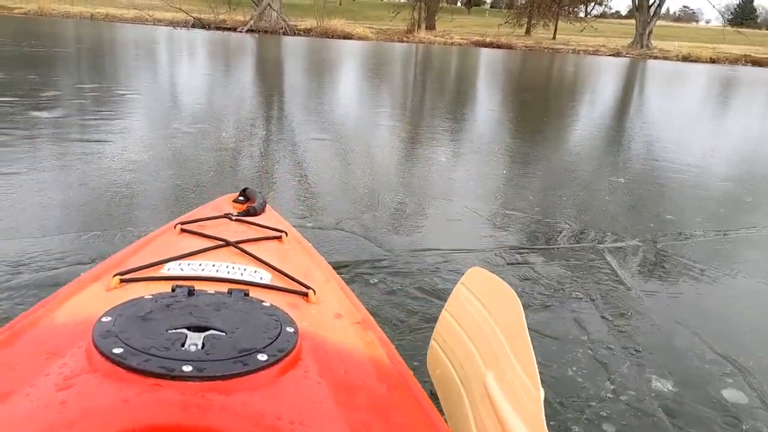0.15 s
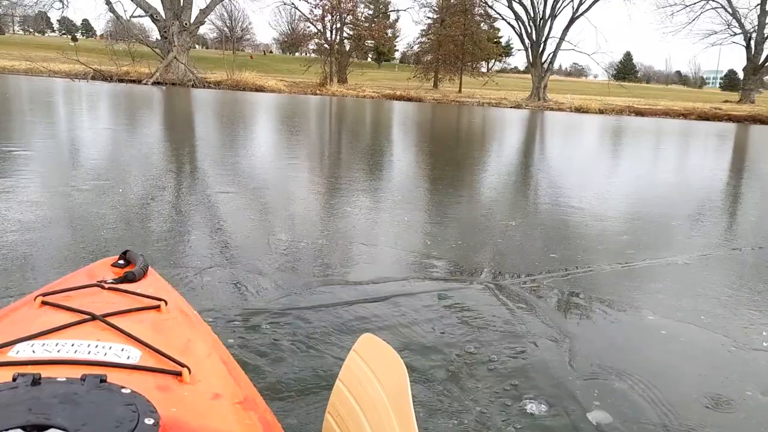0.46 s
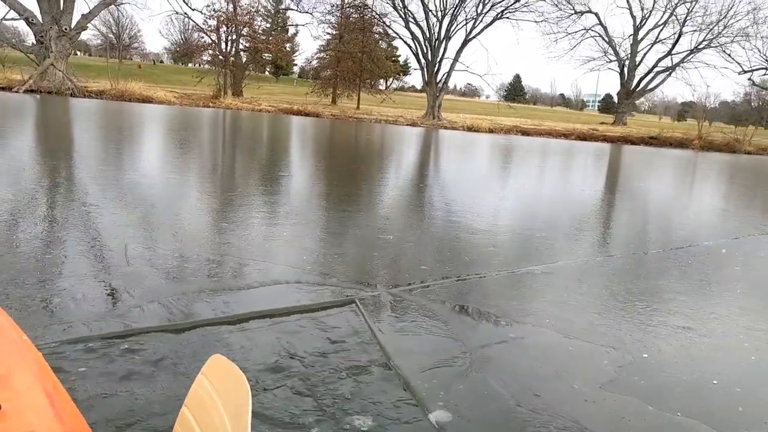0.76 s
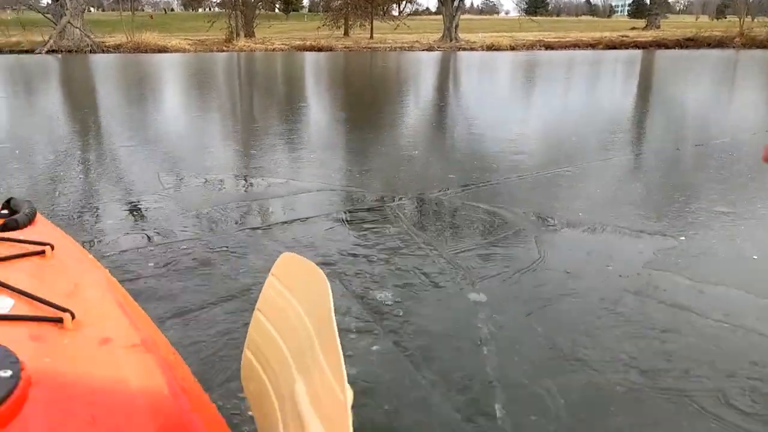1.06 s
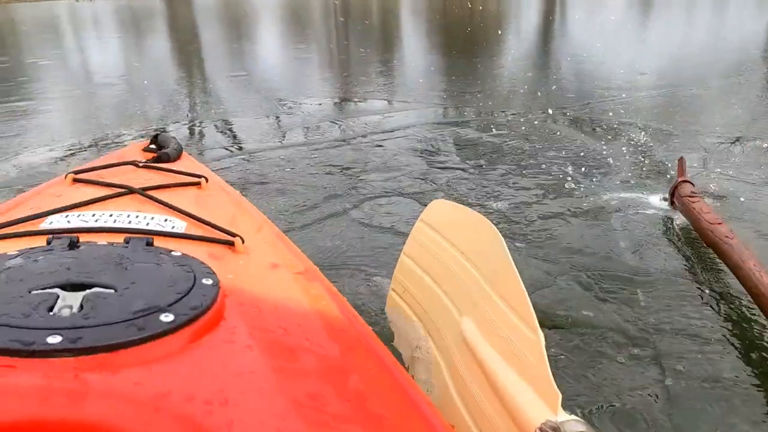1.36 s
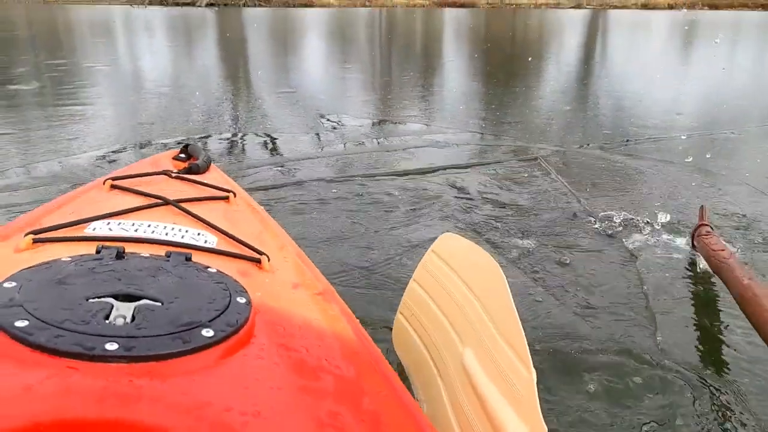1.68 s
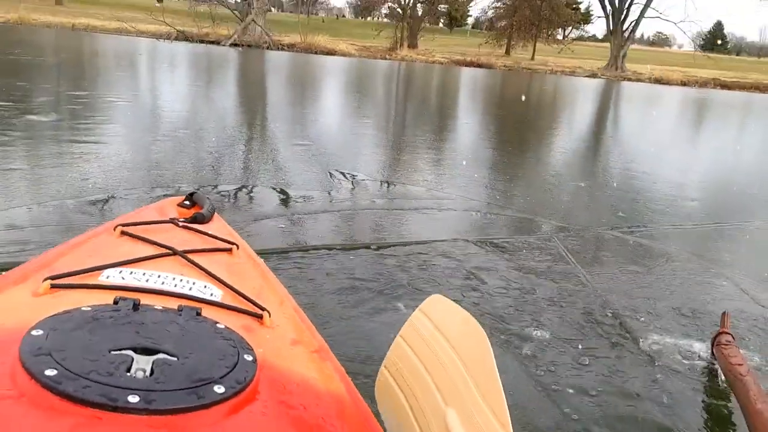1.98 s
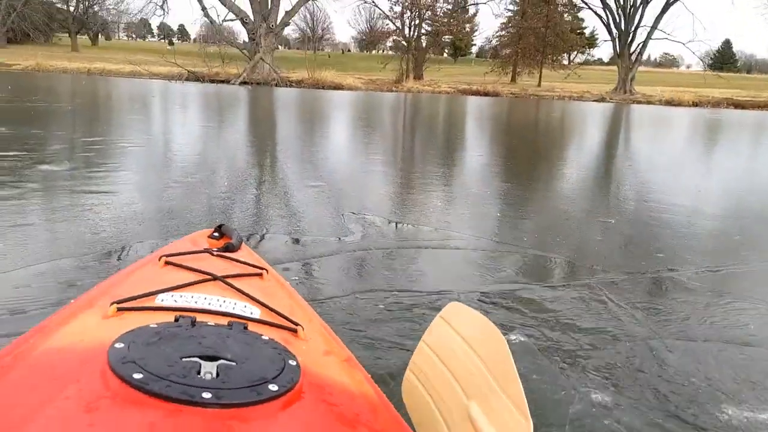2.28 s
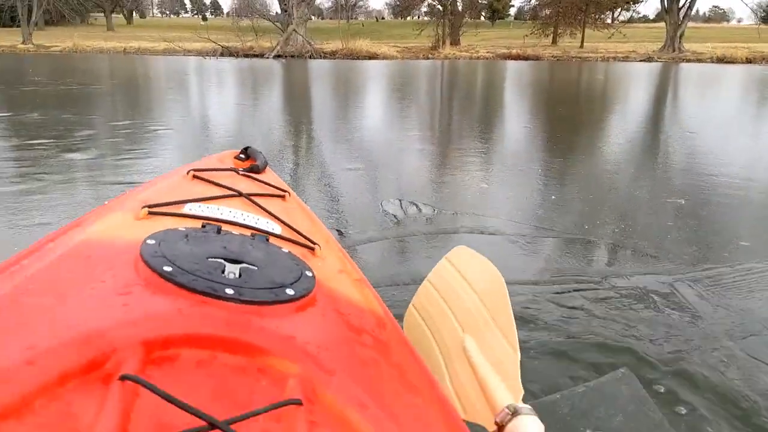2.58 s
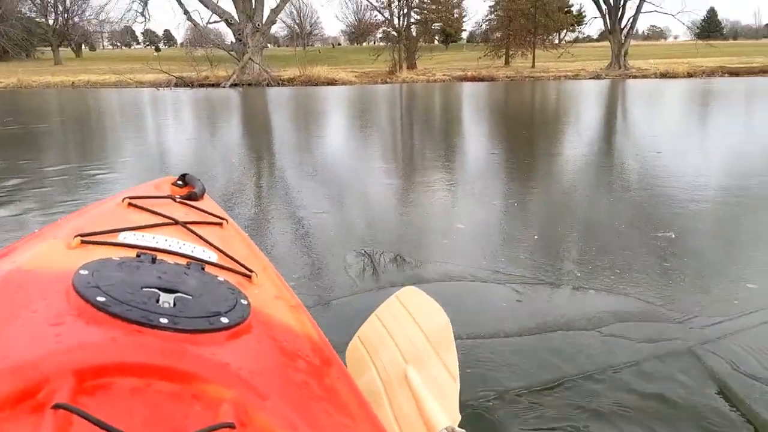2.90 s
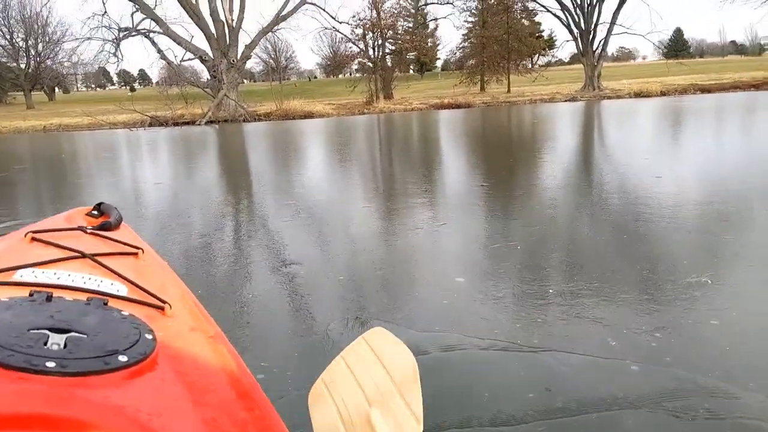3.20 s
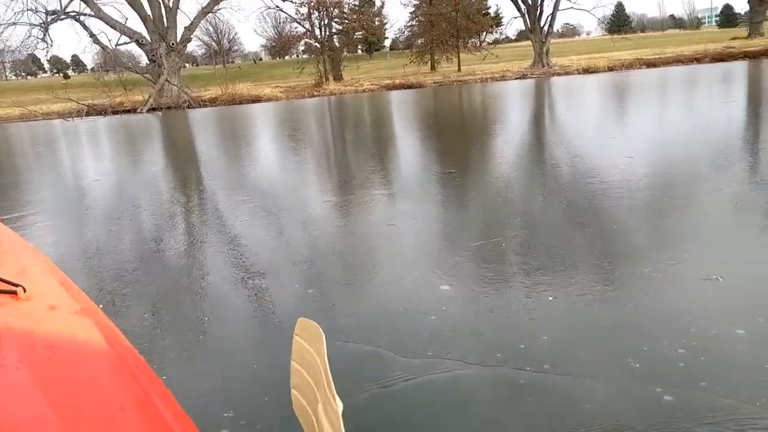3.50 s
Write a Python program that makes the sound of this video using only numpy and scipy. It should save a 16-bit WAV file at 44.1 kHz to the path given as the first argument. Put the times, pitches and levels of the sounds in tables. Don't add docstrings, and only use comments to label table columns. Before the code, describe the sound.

A kayak shoves through thin ice: low crunching grinds, hollow thuds, sharp cracks and wet hiss

```python
import sys
import numpy as np
from scipy import signal
from scipy.fft import rfft, irfft
from scipy.io import wavfile
from scipy.ndimage import uniform_filter1d

SR = 44100
rng = np.random.default_rng(int(sys.argv[2]) if len(sys.argv) > 2 else 0)


def gain_from_decibels(decibels):
    exponent = np.asarray(decibels, float) / 20
    return 10 ** exponent


def pcm_store(signal):
    levels = np.round(np.clip(np.atleast_2d(signal), -1, 1) * 32767)
    wavfile.write(sys.argv[1], SR, levels.astype(np.int16).T)


N = 160965
T = np.arange(N) / SR
F = np.maximum(np.arange(N // 2 + 1) * SR / N, 1)


def unit(x):
    return x / np.sqrt(np.mean(x ** 2) + 1e-18)


def read(table, hz):
    a = np.array(table, float)
    return np.interp(np.log(hz), np.log(a[:, 0]), a[:, 1])


def colour(x, table):
    return irfft(rfft(x) * gain_from_decibels(read(table, F)), N)


def octave(hz):
    return np.clip(1 - np.abs(np.log2(F / hz)), 0, 1)


def band(x, hz, width):
    return signal.lfilter(*signal.iirpeak(min(hz, .45 * SR), max(hz / width, .3), fs=SR), x)


def walk(rate):
    k = int(SR / rate)
    steps = np.repeat(rng.standard_normal(N // k + 1), k)
    return unit(uniform_filter1d(uniform_filter1d(steps, k), k)[:N])


def ticks(rate, spread_db):
    u = rng.random((3, N))
    size_db = np.minimum(-np.log(u[2] + 1e-9), 4) * spread_db
    return (u[0] < rate / SR) * np.sign(u[1] - .5) * gain_from_decibels(size_db)


def fade(x, t60):
    return signal.lfilter([1], [1, -np.exp(-np.log(1000) / (t60 * SR))], x)


def span(start, length):
    return slice(int(start * SR), int((start + length) * SR))


def shape(at, rise, hold, t60):
    out = np.zeros(N)
    i = slice(max(int(at * SR), 0), int((at + rise + hold + 1.2 * t60) * SR))
    t = T[i] - at
    out[i] = np.clip(t / rise, 0, 1) ** 2 * gain_from_decibels(-60 * np.clip(t - rise - hold, 0, None) / t60)
    return out


def bursts(table, noise, width, rise, t60):
    out = np.zeros_like(noise)
    for s, db, hz in table:
        i = span(s, 1.0)
        ring = unit(band(band(noise[:, i], hz, 2 * width * hz), hz, width * hz))
        out[:, i] += gain_from_decibels(db) * shape(s, rise, 0, t60)[i] * ring
    return out


WIND_HZ, WIND_WIDTH_HZ, WIND_DB, WIND_GUST_DB = 58.3, 85, -43, 2.5


def wind():
    low = rng.standard_normal((2, N))
    for _ in range(2):
        low = band(low, WIND_HZ, WIND_WIDTH_HZ)
    gusts = np.array([walk(5.34), walk(5.4)])
    return unit(low) * gain_from_decibels(WIND_DB + WIND_GUST_DB * gusts)


# time in seconds, hiss level in dB, low wash level in dB.
SLUSH_FLOW = [
    (0, -47, -46.5),
    (.62, -47.5, -43.5),
    (.72, -51, -54),
    (1.3, -47.5, -49.5),
    (1.58, -51.5, -49.5),
    (1.9, -47, -46),
    (2.0, -43, -47),
    (2.25, -43.5, -38),
    (2.9, -42, -36.5),
    (3.65, -38, -28),
]
HISS, LOW = 1, 2


def slush_flow(column):
    a = np.array(SLUSH_FLOW)
    return gain_from_decibels(np.interp(T, a[:, 0], a[:, column]))


# pitch in Hz, level in dB per Hz.
HISS_TONE = [(3000, -20), (4000, -15.5), (8600, -12.5), (10800, -22), (13000, -15), (15600, -7.5),
             (15950, -60)]
# pitch in Hz, level in dB per Hz.
WASH_TONE = [(200, -53), (350, -7), (700, 0), (1500, -4.5), (2950, -10.5), (3150, -12.5), (6000, -38)]
SLUSH_DB, SLUSH_SWELL_DB, SLUSH_FLICKER_DB = .1, .8, 1.3


def slush(tone):
    spectrum = rfft(colour(rng.standard_normal((3, N)), tone))
    out, swell = 0, walk(4)
    for hz in 177 * 2. ** np.arange(8):
        part = irfft(spectrum * octave(hz), N)
        out = out + part * gain_from_decibels(SLUSH_SWELL_DB * swell + SLUSH_FLICKER_DB * walk(12))
    return unit(out) * gain_from_decibels(SLUSH_DB)


CHIPS_PER_S, CHIP_DB, CHIP_SPREAD_DB, CHIP_CYCLES = 45, 5, 1.5, 10
CHIP_LOW_HZ, CHIP_HIGH_HZ = 600, 3010


def chips():
    out, t = np.zeros((3, N)), T[:2048]
    for when, pitch, size, a, b, c in rng.random((int(CHIPS_PER_S * N / SR), 6)):
        i = int(when * (N - len(t)))
        hz = CHIP_LOW_HZ * (CHIP_HIGH_HZ / CHIP_LOW_HZ) ** pitch
        envelope = gain_from_decibels(-60 * t * hz / (4 * CHIP_CYCLES)) * np.clip(t * hz / 2, 0, 1)
        ping = np.sin(2 * np.pi * hz * t * (1 + 4 * t)) * envelope
        level = gain_from_decibels(CHIP_DB - CHIP_SPREAD_DB * np.log(size + 0.027))
        out[:, i:i + len(t)] += level * ping * np.array([[1], [b - c], [a - c]])
    return out


RUB_S, RUB_LENGTH_S, RUB_DB = 2.93, .17, -44.5
RUB_HZ, RUB_CLIMB_HZ_PER_S = 195, 190


def rub():
    slip_hz = (RUB_HZ + RUB_CLIMB_HZ_PER_S * (T - RUB_S)) * (1 + .004 * walk(60))
    turns = np.cumsum(slip_hz) / SR
    squeak = sum(gain_from_decibels(3 * walk(30)) * np.sin(2 * np.pi * k * (turns + k / 7)) for k in range(5, 14))
    return gain_from_decibels(RUB_DB) * shape(RUB_S, RUB_LENGTH_S / 2, RUB_LENGTH_S / 2, .05) * unit(squeak)


# pitch in Hz, level in dB, time to die by 60 dB in seconds.
PADDLE_MODES = [(2158, 0, 0.0058), (3740, -12.5, 0.012), (7000, -14.5, 0.015)]
PADDLE_S, PADDLE_RISE_S = 1.3395, 0.0018


def paddle():
    return sum(gain_from_decibels(db) * shape(PADDLE_S, PADDLE_RISE_S, 0, t60) * np.sin(2 * np.pi * hz * T)
               for hz, db, t60 in PADDLE_MODES)


SNAPS_PER_S, SNAP_SPREAD_DB, SNAP_DB, SNAP_T60_S = 35, 3.5, -12, .012


def snaps(noise):
    out = np.zeros((3, N))
    for hz in (5500, 14000):
        clicks = unit(fade(np.abs(ticks(SNAPS_PER_S, SNAP_SPREAD_DB)), SNAP_T60_S))
        out += gain_from_decibels(SNAP_DB) * clicks * slush_flow(HISS) * unit(band(noise, hz, hz / 2))
    return out


# start in seconds, level in dB, pitch in Hz.
POPS = [(0.099, -34, 900), (0.222, -28, 600), (0.633, -24, 452), (0.717, -34, 1540), (0.921, -32.5, 1160),
        (1.279, -29, 571), (1.34, -14, 603), (2.0, -13.5, 1230), (2.086, -11.5, 1120), (2.255, -23, 860),
        (2.407, -15, 1300), (2.43, -11, 634), (2.47, -24, 750), (2.534, -19, 586), (2.93, -21.5, 560),
        (3.121, -12, 480), (3.229, -15, 450), (3.26, -31, 716), (3.33, -10.5, 880), (3.5, -27, 603),
        (3.621, -21.5, 640), (0.337, -21.5, 910), (0.509, -20.5, 490), (0.744, -14.5, 513),
        (0.997, -25, 960), (1.092, -19, 810), (1.15, -11.5, 900), (1.372, -16, 890), (1.542, -27, 515),
        (1.674, -29, 1480), (1.804, -31.5, 1700), (1.937, -12.5, 646), (1.995, -13, 660),
        (2.09, -10.5, 567), (2.405, -14, 635), (3.14, -18, 1080)]
POP_WIDTH, POP_GAIN_DB, POP_RISE_S, POP_T60_S = 0.32, -7, 0.0024, 0.08


def pops(noise):
    return gain_from_decibels(POP_GAIN_DB) * bursts(POPS, noise, POP_WIDTH, POP_RISE_S, POP_T60_S)


GRIT_PER_S, GRIT_SPREAD_DB, GRIT_T60_S = 600, 4.5, .012


def grit():
    return unit(fade(np.abs(ticks(GRIT_PER_S, GRIT_SPREAD_DB)), GRIT_T60_S))


# start in seconds, length in seconds, level in dB, strongest pitch in Hz.
CRUMBLES = [(0.29, 0.29, -49.5, 4600), (0.898, 0.32, -47, 8370), (1.354, 0.035, -33, 1150),
            (1.404, 0.028, -43, 1970), (1.473, 0.032, -43.5, 2400), (1.531, 0.02, -47.5, 2300),
            (1.648, 0.036, -46, 7300), (1.932, 0.092, -37, 2230), (2.055, 0.036, -39.5, 8350),
            (2.296, 0.016, -26, 5300), (2.373, 0.053, -31.5, 7700), (2.405, 0.054, -28, 1130),
            (2.431, 0.036, -30, 8750), (2.713, 0.06, -41.5, 6250), (3.121, 0.039, -27, 8100),
            (3.243, 0.041, -27.5, 5020), (3.296, 0.017, -32, 4930), (3.31, 0.13, -37, 8400),
            (3.554, 0.062, -45, 1900)]
CRUMBLE_RISE, CRUMBLE_T60_S = 0.25, 0.12
CRUMBLE_RING_DB, CRUMBLE_RING_WIDTH = -2, .2
PURE_AFTER_S = .05


def crumbling(noise, ice):
    common = grit()
    parts = [irfft(rfft(ice) * octave(hz), N) * (common + grit()) for hz in 500 * 2. ** np.arange(6)]
    wide = unit(sum(parts))
    narrow, out = grit() + common, np.zeros((3, N))
    for s, length, db, hz in CRUMBLES:
        i = span(s, length + 0.28)
        pure = np.sqrt(np.clip(length / PURE_AFTER_S, 1, 2))
        tone = unit(band(noise[:, i], hz, CRUMBLE_RING_WIDTH * hz / pure ** 2))
        ring = pure * gain_from_decibels(CRUMBLE_RING_DB) * narrow[i] * tone
        envelope = shape(s, CRUMBLE_RISE * length, (1 - CRUMBLE_RISE) * length, CRUMBLE_T60_S)[i]
        out[:, i] += gain_from_decibels(db) * envelope * (wide[:, i] + ring / 2)
    return out


# start in seconds, level in dB, pitch of the ring in Hz.
CRACKS = [(0.5097, -34, 1990), (0.631, -34.5, 8600), (0.9996, -36, 2000), (1.399, -33, 7000),
          (1.4925, -39, 2490), (1.8, -32, 2190), (1.885, -33.5, 2880), (1.954, -34, 2070),
          (2.084, -18.5, 1420), (2.215, -34, 2320), (2.454, -21, 2140), (2.51, -24, 2740),
          (2.7161, -24, 2000), (2.9343, -29, 13400), (2.9744, -30, 13500), (3.0395, -36, 13000),
          (3.1193, -16, 3470), (3.253, -21, 4800), (3.261, -15.5, 2660), (3.2922, -15.5, 2830),
          (3.3042, -16, 7300), (3.39, -25, 2480), (3.5869, -24, 1990), (1.34, -9, 2180),
          (1.3517, -11.5, 3600), (1.467, -31, 5450), (1.6479, -25, 7650), (1.929, -26, 2850),
          (1.982, -19.5, 2700), (1.9922, -20, 2120), (2.031, -26.5, 5540), (2.0723, -24.5, 3070),
          (2.135, -26.5, 7430), (2.155, -23, 7700), (2.1784, -34, 14600), (2.2997, -14, 2470),
          (2.3226, -15.5, 2060), (2.4051, -19, 2330), (2.6709, -18.5, 7150), (2.7396, -22.5, 9100),
          (3.1358, -11.5, 3200), (3.2264, -25, 2600), (3.3737, -21.5, 8250), (3.4412, -19, 2620),
          (3.549, -23, 2350)]
CRACK_GAIN_DB, CRACK_RISE_S, CRACK_T60_S = -3.5, 0.00067, 0.042
CRACK_RING_DB, CRACK_RING_WIDTH = -5, 0.31


def cracks(noise, ice):
    envelope = sum(gain_from_decibels(db + CRACK_GAIN_DB) * shape(s, CRACK_RISE_S, 0, CRACK_T60_S) for s, db, _ in CRACKS)
    ring = bursts(CRACKS, noise, CRACK_RING_WIDTH, CRACK_RISE_S, CRACK_T60_S)
    return ice * envelope + gain_from_decibels(CRACK_GAIN_DB + CRACK_RING_DB) * ring


# pitch in Hz, level in dB per Hz.
ICE_TONE = [(350, -20), (700, -2.5), (1500, -7.5), (2500, -9), (4000, -16.5), (8500, -16), (10800, -24),
            (15600, -10.5), (16900, -58)]


def breaking():
    noise = rng.standard_normal((3, N))
    ice = unit(colour(noise, ICE_TONE))
    return crumbling(noise, ice) + snaps(noise) + cracks(noise, ice) + pops(noise)


# start in seconds, level in dB, pitch in Hz, level of the overtones in dB.
KNOCKS = [(0.005, -16, 136, -19), (0.059, -17, 167, -16), (0.231, -27.5, 203.5, -15),
          (0.327, -19.5, 199, -9), (0.513, -28, 353, -1.5), (0.633, -31.5, 326.4, -6),
          (0.746, -19, 253, -10), (1.143, -20, 280.2, -3.5), (1.167, -9, 189.4, -5.5), (1.34, -21, 223, 1),
          (1.68, -20, 170.4, -5), (1.936, -18.5, 233.7, 1), (1.991, -7, 221, 3.5), (2.007, -6, 234.8, -8.5),
          (2.093, -13, 200, 3), (2.168, -14, 165.6, -23), (2.27, -15, 196, -8), (2.303, -15, 388.4, -15),
          (2.326, -11, 210.5, -0.5), (2.41, -13, 322, 3), (2.603, -10.5, 205.2, -13),
          (2.677, -5.5, 154.9, -11.5), (2.772, -8.5, 124.9, -8), (2.91, -23, 188, -8),
          (3.021, -20.5, 272, -3), (3.123, -11.5, 221, -14), (3.155, -10.5, 198, -4.5),
          (3.3, -12.5, 177.2, 0.5), (3.391, -11.5, 179.8, 0), (3.422, -9.5, 256.6, -10),
          (3.561, -26, 143.5, -21)]
# pitch as a multiple of the knock's, level in dB.
KNOCK_MODES = [(1, 3), (.45, -3.5), (2.0, -5.5), (3.0, -10.5), (4.4, -15), (6.8, -16.5)]
KNOCK_RISE_S, KNOCK_T60_S, KNOCK_GAIN_DB = 0.003, 0.14, 0.5
KNOCK_DAMP = .4


def knocks():
    out, odd = np.zeros(N), rng.random((len(KNOCKS), 12))
    for (s, db, hz, upper_db), u in zip(KNOCKS, odd):
        i = span(s, .4)
        for k, (ratio, mode_db) in enumerate(KNOCK_MODES):
            f = hz * ratio * (1 + .12 * (u[k] - .5) * (k > 0))
            level = gain_from_decibels(db + mode_db + upper_db * (k > 1) + KNOCK_GAIN_DB)
            envelope = shape(s, KNOCK_RISE_S, 0, KNOCK_T60_S / ratio ** KNOCK_DAMP)[i]
            out[i] += level * envelope * np.sin(2 * np.pi * (f * T[i] + u[k + 6]))
    return out


# pitch in Hz, level in dB.
HULL_MODES = [(65, -0.5), (92, 2.5), (120, 0.5), (160, 3), (200, -6), (262, -10.5), (320, -19), (430, -22),
              (650, -15.5), (950, -18.5)]
# start in seconds, length in seconds, grinding level in dB, bass tilt in dB.
SHOVES = [(-.05, 0.11, -16, 3), (0.194, 0.22, -22, 1), (0.488, 0.077, -22.5, 4), (0.66, 0.14, -37.5, -1),
          (1.135, 0.06, -14.5, 1.5), (1.333, 0.21, -29.5, 1), (1.55, 0.15, -31, 0.5),
          (1.917, 0.18, -15.5, -0.5), (2.145, 0.098, -18.5, 1), (2.283, 0.18, -10, 1),
          (2.407, 0.14, -10, 1.5), (2.567, 0.15, -11, 1), (2.809, 0.21, -19.5, 1.5),
          (3.116, 0.069, -16.5, -1), (3.22, 0.16, -19.5, -1.5), (3.467, 0.044, -24.5, 2)]
SHOVE_RISE_S, SHOVE_T60_S, CREEP_DB = 0.017, 0.52, -35
SLIPS_PER_S, SLIP_SPREAD_DB, SLIP_PUSH_S = 400, 2.5, 0.00076
GRIND_FLICKER_DB, GRIND_LUMP_DB, HULL_WIDTH = 3, 2.5, .32


def grinding():
    jolts = uniform_filter1d(ticks(SLIPS_PER_S, SLIP_SPREAD_DB), int(SLIP_PUSH_S * SR) + 1)
    modes = []
    for hz, db in HULL_MODES:
        flicker = gain_from_decibels(db + GRIND_FLICKER_DB * walk(14))
        modes.append(flicker * unit(band(band(jolts, hz, 2 * HULL_WIDTH * hz), hz, HULL_WIDTH * hz)))
    shapes = [shape(s, SHOVE_RISE_S, length, SHOVE_T60_S) for s, length, _, _ in SHOVES]

    def force(way):
        power = gain_from_decibels(2 * CREEP_DB)
        for (_, _, db, tilt_db), envelope in zip(SHOVES, shapes):
            power = power + (gain_from_decibels(db + way * tilt_db) * envelope) ** 2
        return np.sqrt(power)

    bass, upper = sum(modes[:2]), sum(modes[2:])
    return (bass * force(0.29) + upper * force(-3.2)) * gain_from_decibels(GRIND_LUMP_DB * walk(24.95)) / 2


# pitch in Hz, difference in dB.
LEFT_OVER_RIGHT = [(300, -0.5), (1300, 0), (2400, 2.5), (8500, 4), (10500, 3.5), (12500, -6.5),
                   (16000, -17)]
# pitch in Hz, share from 0 to 1.
APART = [(200, .05), (700, 0.6), (2000, 0.78), (5000, 1), (12000, 0.83)]
AIR_LAG_S, HULL_LAG_S = 0.000418, 0.00017


def scene():
    hiss = slush(HISS_TONE) * slush_flow(HISS)
    low_wash = (slush(WASH_TONE) + chips()) * slush_flow(LOW)
    air = rfft(breaking() + hiss + low_wash)
    apart = np.clip(read(APART, F), 0, 1)
    spread = np.sqrt(1 - apart) * air[0] + np.sqrt(apart) * air[1:]
    side = np.array([[1], [-1]])

    def late(lag):
        return np.exp(-1j * np.pi * F * lag * side)

    both = (rfft(paddle()) + spread) * late(AIR_LAG_S) + rfft(grinding() + knocks()) * late(HULL_LAG_S)
    tilt = gain_from_decibels(read(LEFT_OVER_RIGHT, F) * side / 2)
    tilt = tilt / np.sqrt(np.mean(tilt ** 2, axis=0))
    return irfft(both * tilt, N) + wind() + rub()


def roll_off(x):
    return signal.sosfilt(signal.butter(12, 17160, fs=SR, output="sos"), x)


LOW_CUT_HZ, TOP_HZ, CLIP = 53, 15970, 0.97


def record(dry):
    low_cut = signal.butter(3, LOW_CUT_HZ, "high", fs=SR, output="sos")
    top_cut = signal.ellip(8, .3, 60, TOP_HZ, fs=SR, output="sos")
    x = signal.sosfilt(low_cut, dry)
    x = CLIP * np.tanh(x / CLIP)
    return roll_off(signal.sosfilt(top_cut, x))


dry = scene()
out = record(dry)
pcm_store(out)
```